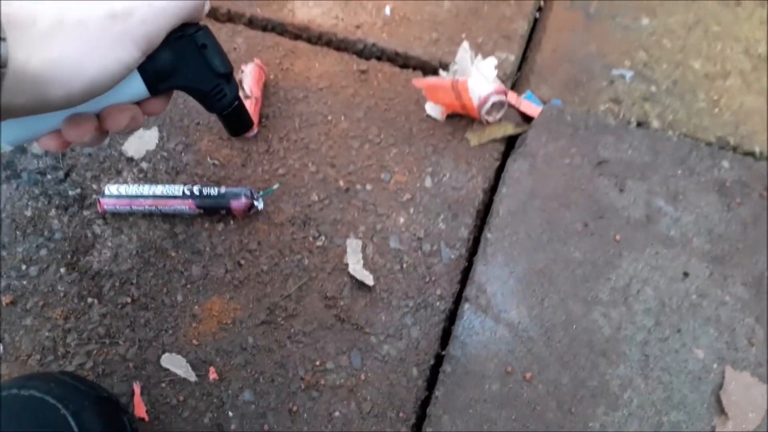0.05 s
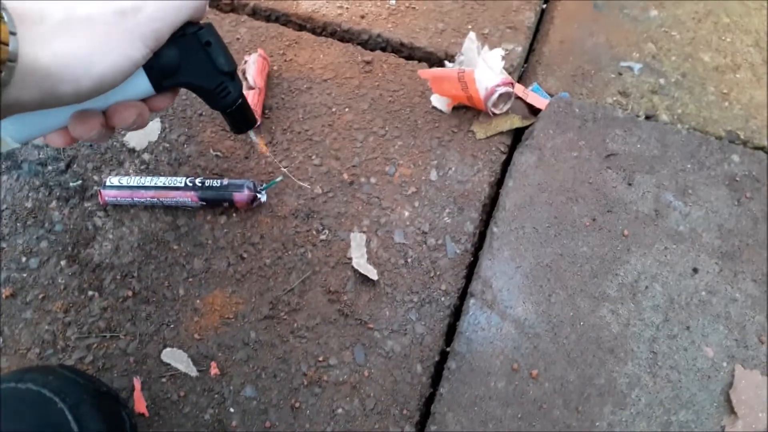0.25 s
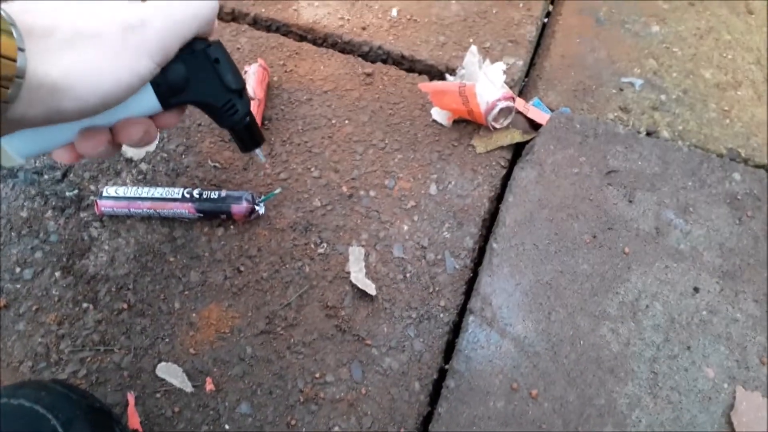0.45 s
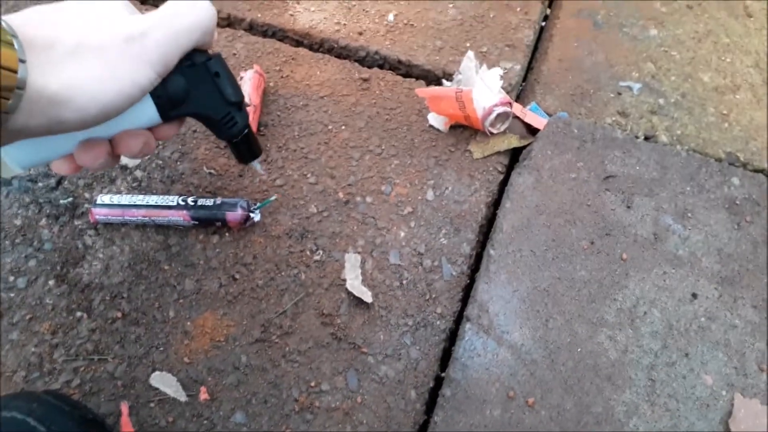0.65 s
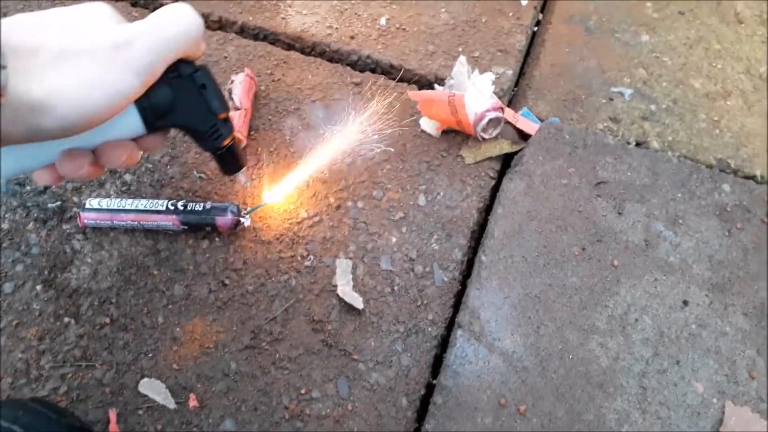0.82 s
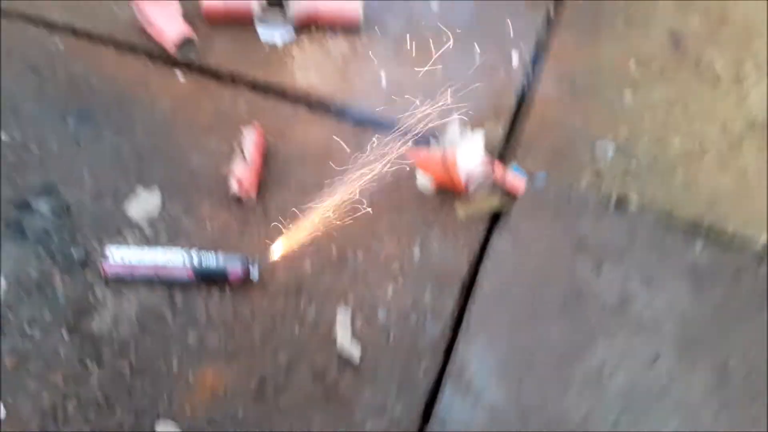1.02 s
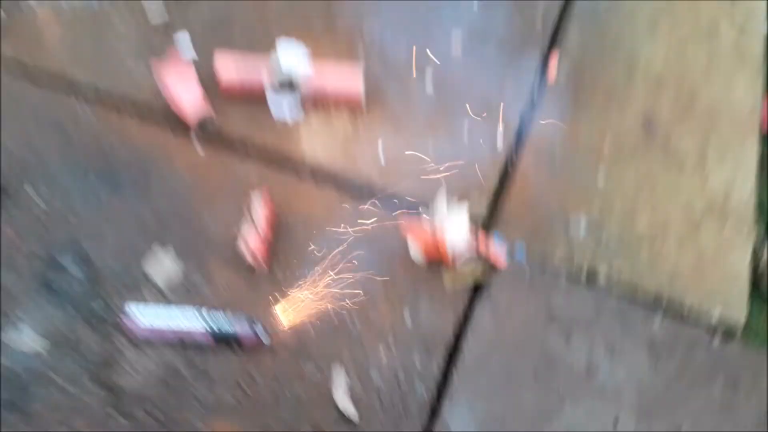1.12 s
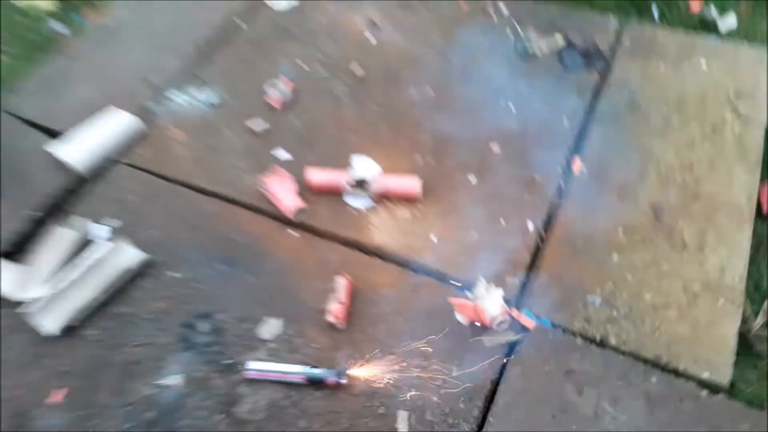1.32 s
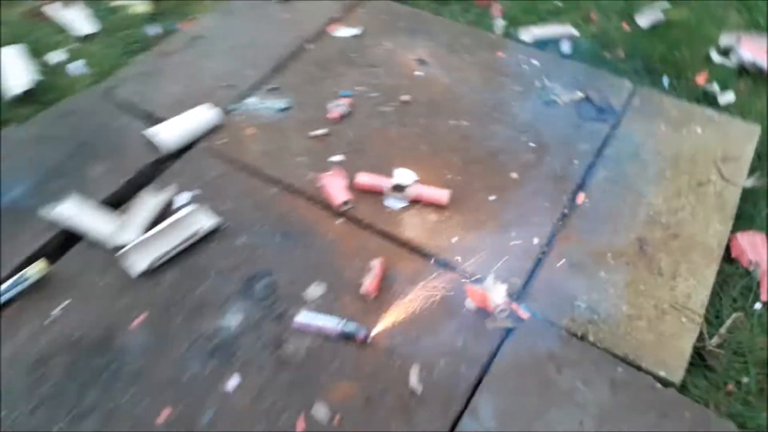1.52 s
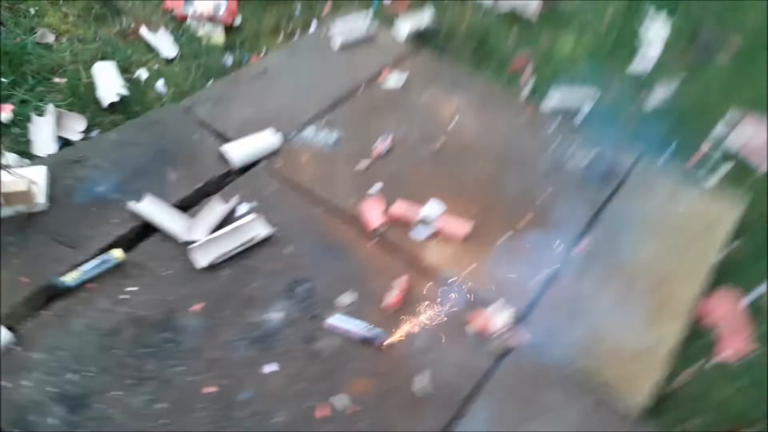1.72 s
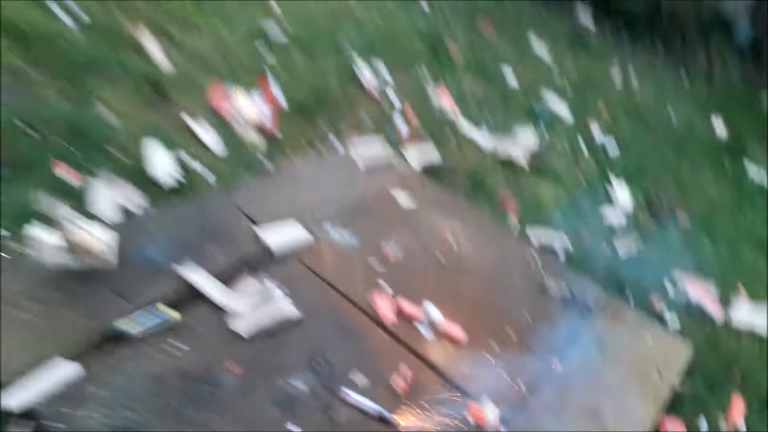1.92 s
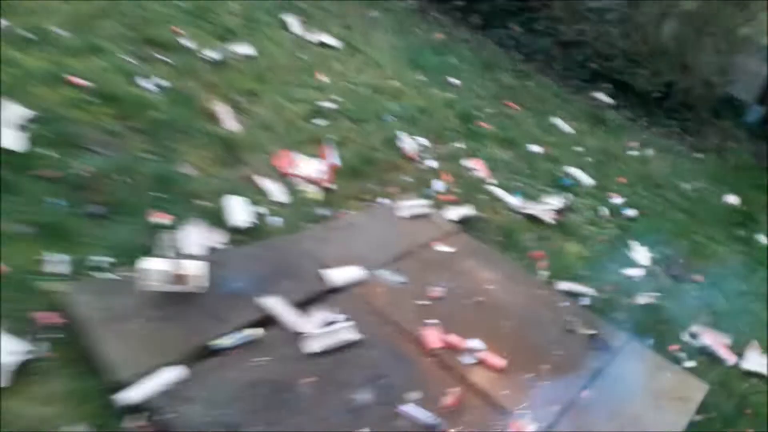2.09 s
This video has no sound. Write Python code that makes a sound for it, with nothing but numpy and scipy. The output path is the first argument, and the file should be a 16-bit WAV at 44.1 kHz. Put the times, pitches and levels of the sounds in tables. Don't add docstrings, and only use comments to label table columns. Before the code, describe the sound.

In a quiet garden, a lighter snaps hard and its flame softly roars, then a fuse bursts into sputtering hiss over paving, heard close on a phone that backs away, ending with pebble knocks.

```python
import sys
import numpy as np
from scipy import signal
from scipy.fft import rfft, irfft
from scipy.io import wavfile
from scipy.ndimage import uniform_filter1d, map_coordinates

SR = 44100
rng = np.random.default_rng(int(sys.argv[2]) if len(sys.argv) > 2 else 0)


def decibels_to_gain(level_db):
    exponent = np.asarray(level_db, float) / 20
    return 10 ** exponent


def to_wav(s):
    ch = np.atleast_2d(s).T
    pcm = np.round(np.clip(ch, -1, 1) * 32767)
    wavfile.write(sys.argv[1], SR, pcm.astype(np.int16))


N = 94815
T = np.arange(N) / SR
SNAP_S = .2456
SINCE_SNAP = np.maximum(T - SNAP_S, 0)


def noise():
    return rng.standard_normal(N)


def level(x, db):
    return x * decibels_to_gain(db) / np.sqrt(np.mean(x ** 2))


def curve(rows, axis=1):
    rows = np.array(rows)
    return np.interp(T, rows[:, 0], rows[:, axis])


def bump(at, length):
    return np.exp(-(2 * (T - at) / length) ** 2)


def walk(rate):
    hold = int(SR / rate)
    values = rng.standard_normal(N // 50 + 1)[:N // hold + 1]
    steps = np.repeat(values, hold)
    smooth = uniform_filter1d(uniform_filter1d(steps, hold), hold)[:N]
    return smooth / smooth.std()


def colour(x, points):
    hz = np.maximum(np.linspace(0, SR / 2, 1025), 1)
    f, db = np.array(points).T
    cepstrum = irfft(np.log(decibels_to_gain(np.interp(np.log(hz), np.log(f), db))))
    cepstrum[1:1024] *= 2
    cepstrum[1025:] = 0
    return signal.fftconvolve(x, irfft(np.exp(rfft(cepstrum))))[:N]


def bands(x, gains_db):
    spec = rfft(x)
    hz = np.maximum(np.arange(N // 2 + 1) * SR / N, 1)
    octave = np.clip(np.log2(hz / 125), 0, len(gains_db) - 3.5)
    out = np.zeros(N)
    for k, gain in enumerate(gains_db):
        out += irfft(spec * np.clip(1 - abs(octave - k), 0, 1), N) * decibels_to_gain(gain)
    return out


def ring(x, hz, t60):
    pole = np.exp((2j * np.pi * hz - np.log(1000) / t60) / SR)
    return signal.lfilter([1], [1, -pole], x).imag


# f/Hz, level/dB [dB per Hz]
HUM = [(25, -14.5), (150, -6), (400, -15), (700, -17), (1800, -12), (3000, -16.5), (3700, -40),
       (15800, -44)]


def garden():
    hum = level(colour(noise(), HUM), -56.5)
    return bands(hum, [-walk(5) for _ in range(8)])


# t/s, f/Hz, level/dB, t60/s
KNOCK = [
    (.058, 2900, -43, .02),
    (.059, 1470, -43, 0.027),
    (1.975, 776, -28.5, 0.022),
    (2.1, 2000, -33, 0.14),
]


def pebbles():
    out = np.zeros(N)
    for start, hz, db, t60 in KNOCK:
        since = np.maximum(T - start, 0)
        onset = np.minimum(since / 0.0038, 1)
        out += decibels_to_gain(db - 60 * since / t60) * onset * np.sin(2 * np.pi * hz * since)
    return out


# f/Hz, level/dB [dB per Hz]
FLAME = [(300, -7), (900, 1.5), (2000, 2), (3100, -6), (3900, -40), (11500, -36), (12900, -23.5),
         (14500, -40.5)]
# t/s, level/dB
TORCH = [
    (.252, -70),
    (.26, -49.5),
    (.3, -51.5),
    (.55, -54.5),
    (.8, -55.5),
    (1.0, -59),
]


def torch():
    roar = level(colour(noise(), FLAME), 0)
    return roar * decibels_to_gain(curve(TORCH) + 1.63 * walk(25)) * (T > SNAP_S)


# f/Hz, level/dB, t60/s
BODY = [(1740, -27.5, .009), (2000, -27, 0.015), (2635, -14, 0.0022), (3210, -2, 0.0035),
        (5250, -16, 0.0025), (6700, -16, 0.0035), (7600, -3.5, 0.0026), (8320, -13, 0.0021),
        (9930, -25.5, 0.0038), (11410, -21.5, 0.0045), (13200, -26.5, 0.0032), (15000, -30, .003)]
# t/s, level/dB, contact/ms
STRIKES = [
    (.2432, -50, .2),
    (.2456, -2, .04),
    (.24823, -4, .16),
    (.2509, -22, .16),
    (.2672, -37, .03),
    (.2905, -48, .03),
    (.306, -54, .03),
]


def hammer():
    push = np.zeros(N)
    for start, db, ms in STRIKES:
        jolt = bump(start, ms / 1000)
        push += decibels_to_gain(db) * jolt / jolt.sum()
    out = np.zeros(N)
    for k, (hz, db, t60) in enumerate(BODY):
        swell = ring(ring(push, hz, t60), hz, t60) * 40 / (t60 * SR)
        out += (-1) ** k * decibels_to_gain(db) * swell
    return out


# f/Hz, level/dB, t60/s
THUMP = [(107, -37.5, .05), (200, -42, .025), (330, -47, 0.03), (460, -45, 0.037)]


def thump():
    return sum(decibels_to_gain(db - 60 * SINCE_SNAP / t60) * np.sin(2 * np.pi * hz * SINCE_SNAP)
               for hz, db, t60 in THUMP)


def crack_and_rattle():
    air = colour(noise(), [(1500, -40), (4000, 0), (7500, -4), (10000, -3.5), (15000, -18.5)])
    crack = decibels_to_gain(-18 - 60 * SINCE_SNAP / .012)
    rattle = decibels_to_gain(-63 - 60 * SINCE_SNAP / .45)
    return level(air, 0) * np.minimum(SINCE_SNAP / 0.001, 1) * (crack + rattle)


def lighter():
    return hammer() + thump() + crack_and_rattle()


# t/s, level/dB, length/s, centre f/Hz
CATCH = (1.03, -44.5, 0.0869, 400)


def catch_whoosh():
    start, db, length, hz = CATCH
    low = colour(noise(), [(hz / 4, -20), (hz, 0), (hz * 3, -20), (8000, -60)])
    return level(low, db) * np.exp(-(2 * (T - start) / length) ** 4)


# f/Hz, level/dB [dB per Hz]
JET = [(60, -35), (120, -14), (500, -4.5), (1300, -2), (3400, -7), (4000, -8.5), (7000, -11.5),
       (15800, -27)]


def jet_tone(gas):
    return level(colour(gas, JET), 0)


# t/s, level/dB
SPARKS = [
    (0.831, -59),
    (.854, -60),
    (0.9484, -35),
    (1.551, -30.5),
    (1.939, -44),
    (2.046, -41),
    (2.087, -37),
]


def large_sparks():
    spit = np.zeros(N)
    for start, db in SPARKS:
        since_ms = np.maximum(T - start, 0) * 1000
        spit += decibels_to_gain(db) * (T > start) * np.exp(-since_ms / 2.1)
    return spit * jet_tone(noise())


# t/s, treble level/dB, extra sizzle/dB (for bands 6 and 7, empty in this split),
# length/s
PUFFS = [(.85, -5.5, -7, 0.1), (0.889, -4, -3, 0.032), (0.942, -3, 3, 0.031), (1.014, -7, -3, 0.16),
         (1.108, 4, 4, .03), (1.209, 5, 0, 0.017), (1.321, -3, -4, 0.029), (1.356, 6, 2, 0.039),
         (1.387, 0, 0, 0.023), (1.455, 2.5, 8, .07), (1.51, 1.5, -5, 0.053), (1.62, 2.5, -2, 0.11),
         (1.683, -3, -5, 0.06), (1.76, 0.5, 6, 0.068), (1.808, -6.5, 0, 0.079), (1.84, 5.5, 3, 0.017),
         (1.925, -8.5, -1, 0.032), (2.02, -4.5, -7, .1), (2.112, 2.5, -5, 0.039)]


def surges():
    puff = .5 * walk(23.5) + .6 * walk(130)
    sizzle = np.zeros(N)
    for start, treble_db, sizzle_db, length in PUFFS:
        swell = bump(start, length)
        puff += treble_db * swell
        sizzle += sizzle_db * swell
    return puff, sizzle


# f/Hz, level/dB
CORE = [(500, -35.5), (1200, -10), (1900, -5.5), (2600, 0), (3150, -2.5), (3650, -15.5), (6000, -54)]
# t/s, spray level/dB, core focus/dB, top gain/dB (for bands 6 and 7, empty in this split)
BURN = [
    (.795, -59.5, 5, -4),
    (.83, -37, 7, -2),
    (.97, -33, 8.5, -3),
    (1.12, -38.5, 6.5, -1),
    (1.3, -41.5, 3, 0.5),
    (1.46, -42, 4, 3),
    (1.61, -39, 5.5, .6),
    (1.71, -42, 3, -1),
    (2.15, -41.5, 0, -4),
]


def burning_jet():
    bursts_per_s, spread_db, hiss_db, bass_share = 12000, 1.0, 4, 0.45
    chance, sign, size = rng.random((3, N))
    bursts = (chance < bursts_per_s / SR) * np.sign(sign - .5) * decibels_to_gain(-spread_db * np.log(size + 0.00088))
    gas = level(bursts, 0) + decibels_to_gain(hiss_db) * noise()
    puff, sizzle = surges()
    top = curve(BURN, axis=3) + sizzle
    gains = []
    for k in range(8):
        share = bass_share if k < 5 else 1
        gains.append(.6 * walk(13.9) + puff * share + top * {6: .3, 7: 1.7}.get(k, 0))
    spray = bands(jet_tone(gas), gains)
    core = level(colour(noise(), CORE), 0) * decibels_to_gain(curve(BURN, axis=2) + bass_share * puff)
    sputter = decibels_to_gain(curve(BURN) + .7 * walk(59.65))
    return (spray + core) * sputter * np.clip((T - BURN[0][0]) / .01, 0, 1)


# t/s, lag/ms, lag/ms, lag/ms
ECHO = [
    (.8, 0.78, 0.27, 1.28),
    (1.2, 0.65, 0.42, 0.89),
    (1.6, .53, 0.28, 1.22),
    (1.8, 0.605, .42, 1.22),
    (2.15, 0.6, .45, 1.1),
]


def mirrored(jet):
    treble = signal.sosfilt(signal.butter(2, 7500, "high", fs=SR, output="sos"), jet)
    late = np.zeros(N)
    for path in (1, 2, 3):
        lag = curve(ECHO, axis=path) * SR / 1000
        late += map_coordinates(treble, [np.arange(N) - lag], mode="nearest")
    return jet + decibels_to_gain(-12) * late


def fuse():
    return mirrored(burning_jet() + large_sparks() + catch_whoosh())


def scene():
    return (fuse() + lighter() + torch() + garden() + pebbles())[None]


# f/Hz, level/dB [dB per Hz]
SELF_NOISE = [(3000, -6), (4800, -7), (8000, 0), (13000, -3), (15500, -8)]


def microphone(dry):
    dip_hz, dip_width_hz, dip_share = 7150, 600, .75
    b, a = signal.iirpeak(dip_hz, dip_hz / dip_width_hz, fs=SR)
    x = dry - dip_share * signal.lfilter(b, a, dry)
    x = x + level(colour(noise(), SELF_NOISE), -73.5)
    return signal.sosfilt(signal.ellip(10, .2, 60, 15680, fs=SR, output="sos"), x)


def top_cut(x):
    return signal.sosfilt(signal.butter(12, 16740, fs=SR, output="sos"), x)


def record(dry):
    mix = microphone(dry)
    return top_cut(mix)


dry = scene()
out = record(dry)
to_wav(out)
```